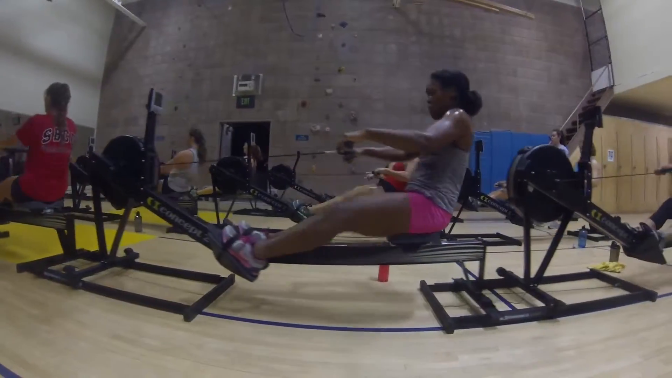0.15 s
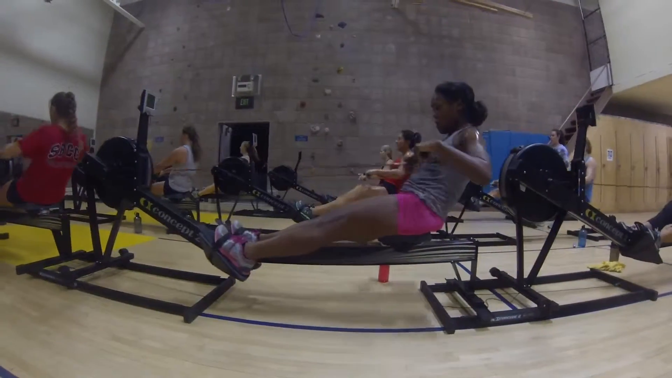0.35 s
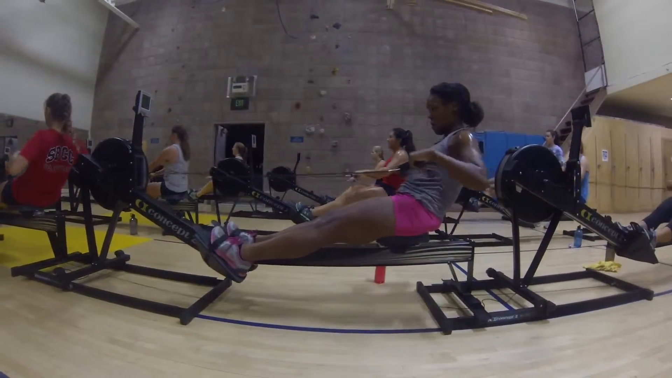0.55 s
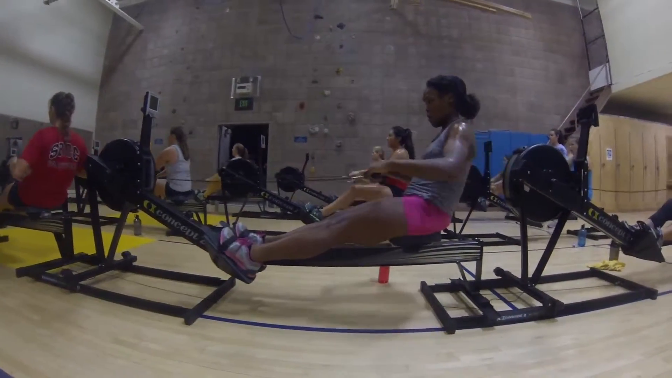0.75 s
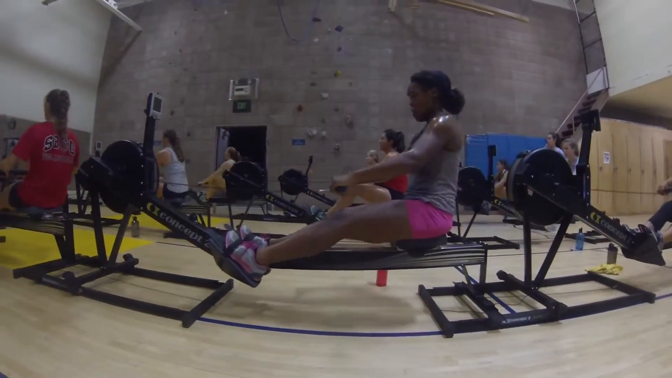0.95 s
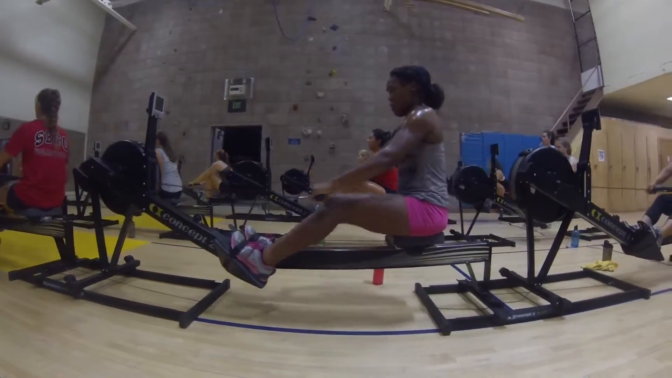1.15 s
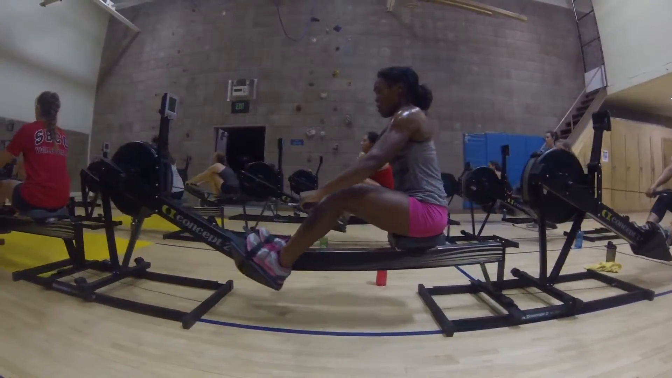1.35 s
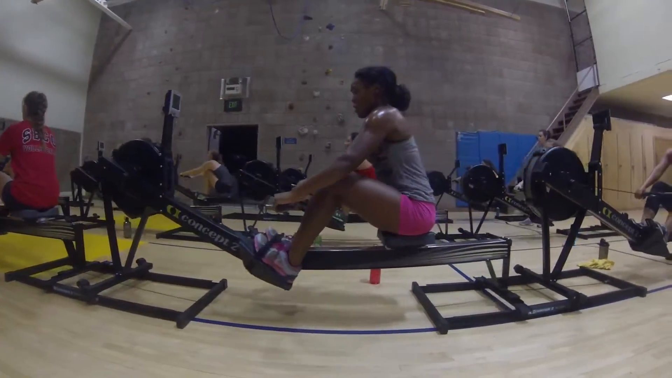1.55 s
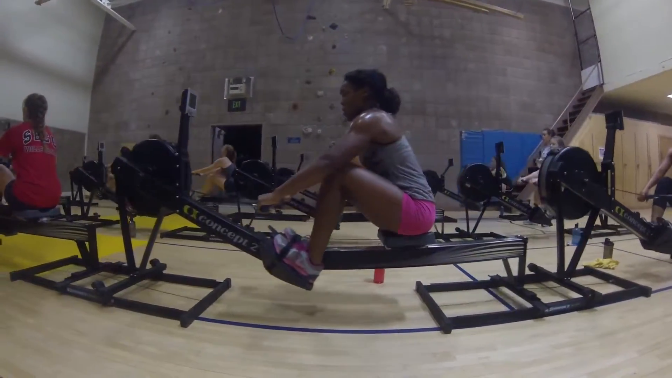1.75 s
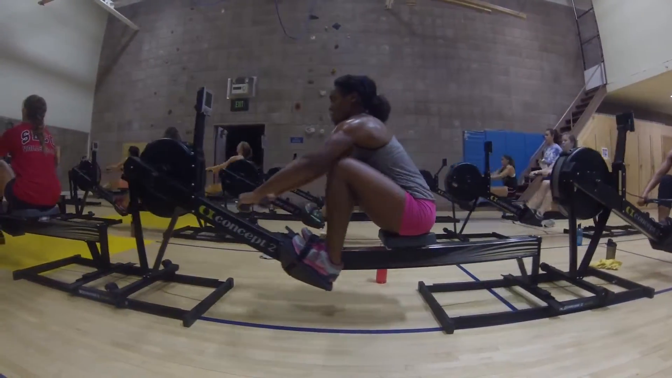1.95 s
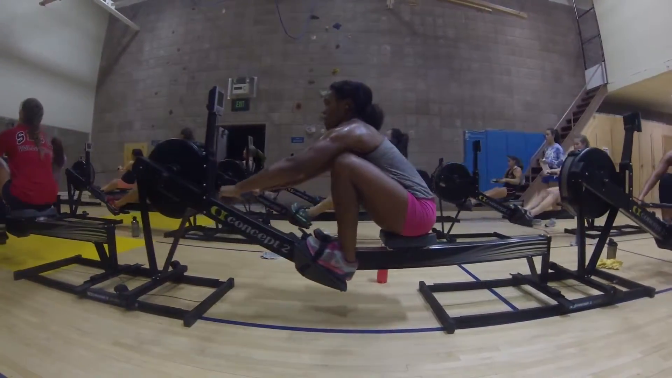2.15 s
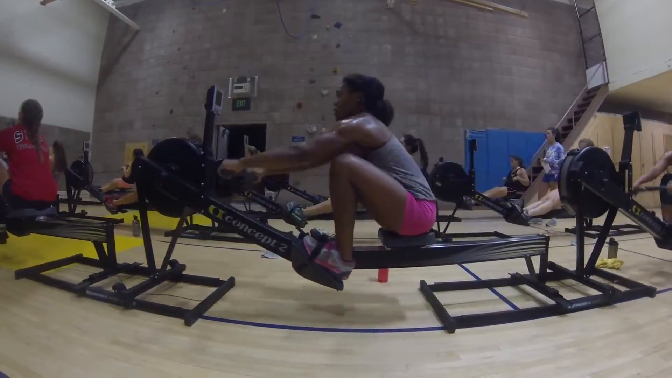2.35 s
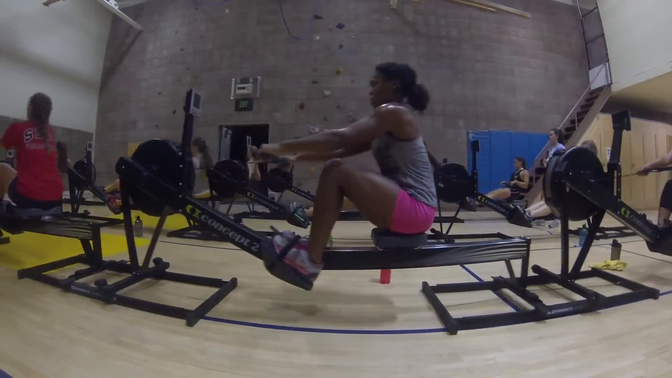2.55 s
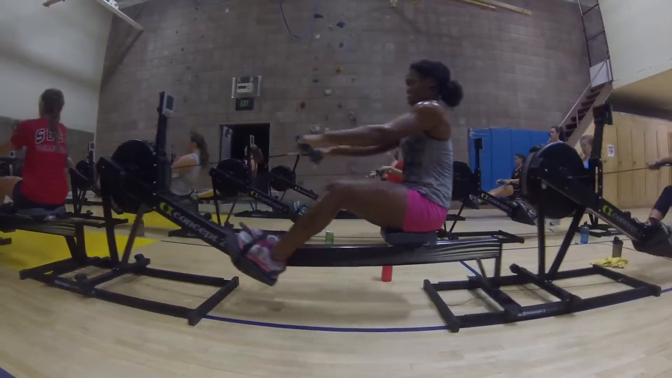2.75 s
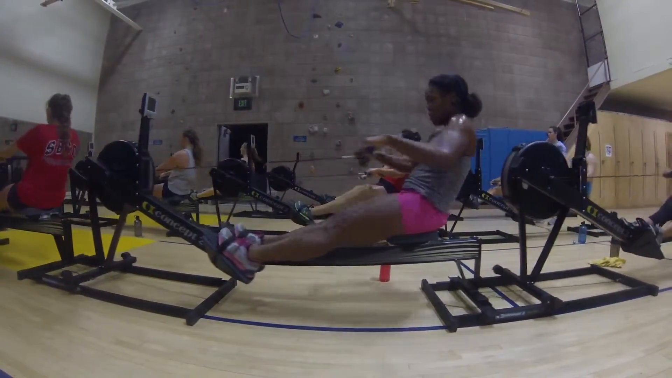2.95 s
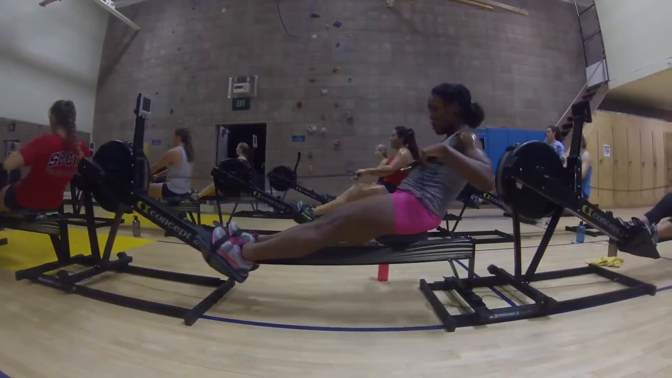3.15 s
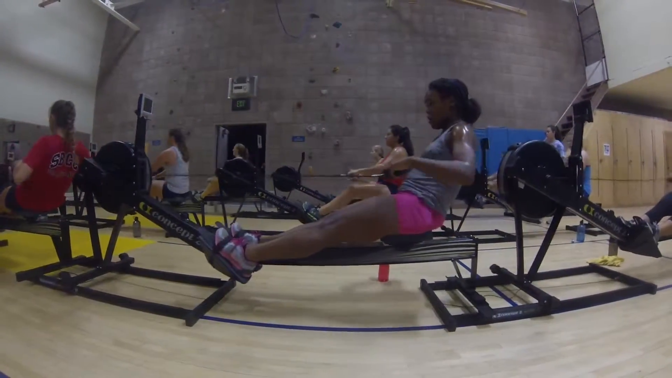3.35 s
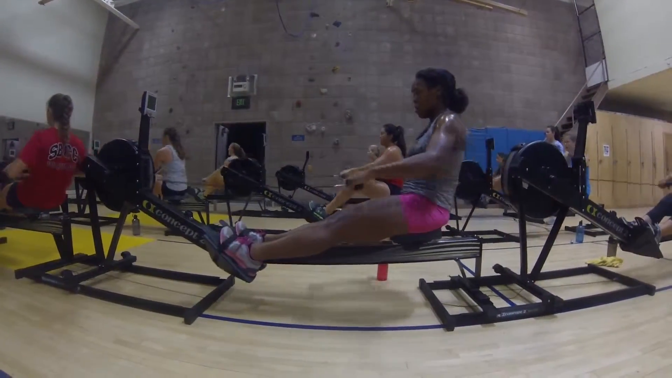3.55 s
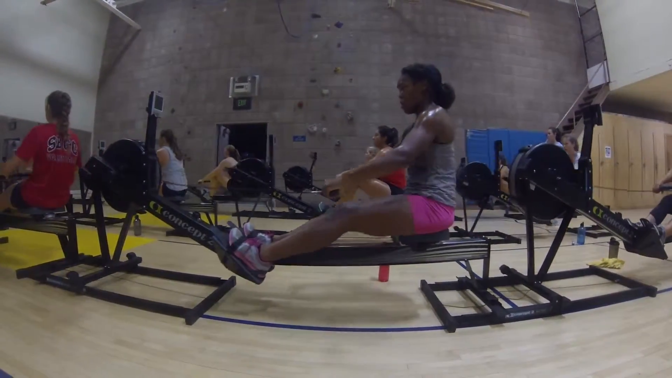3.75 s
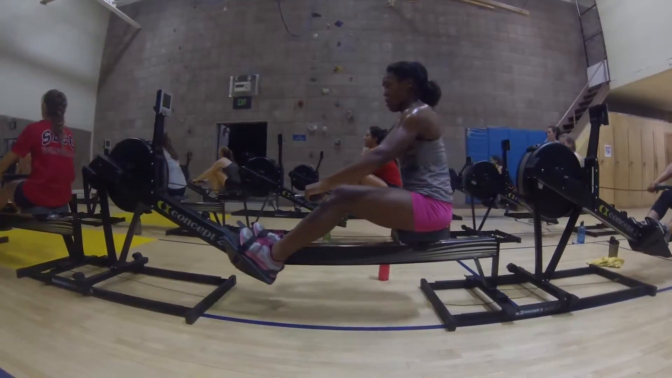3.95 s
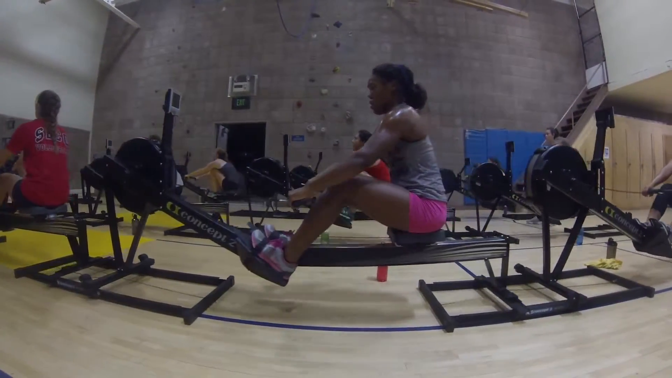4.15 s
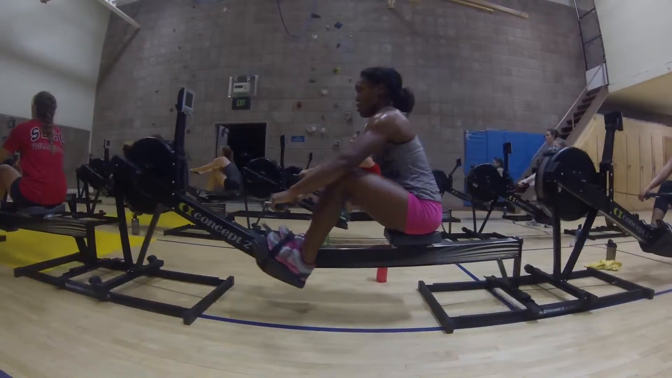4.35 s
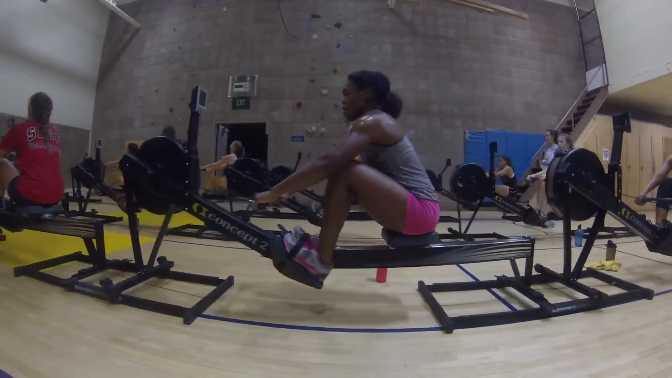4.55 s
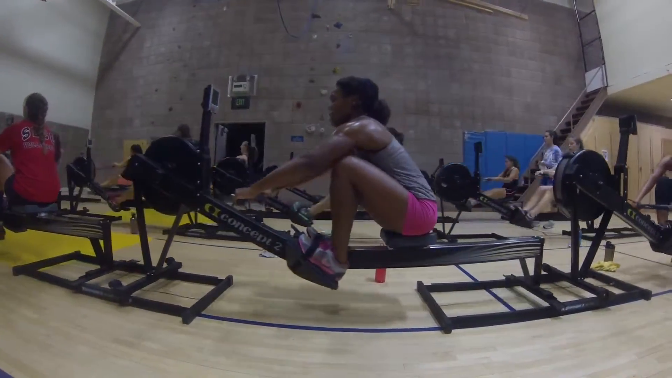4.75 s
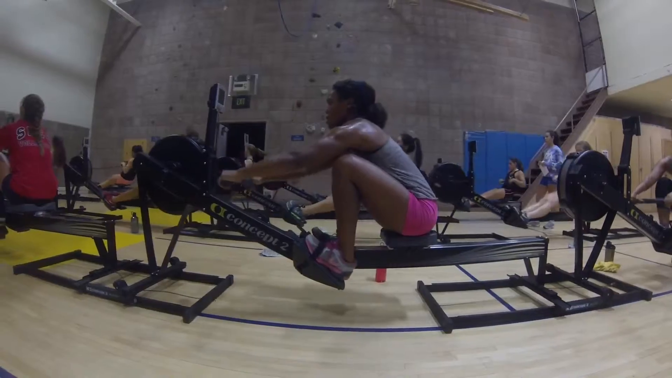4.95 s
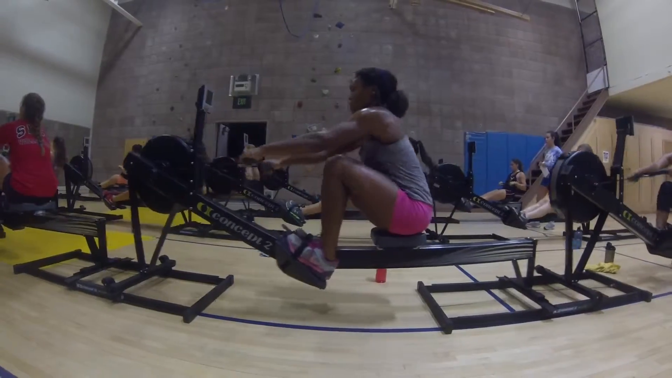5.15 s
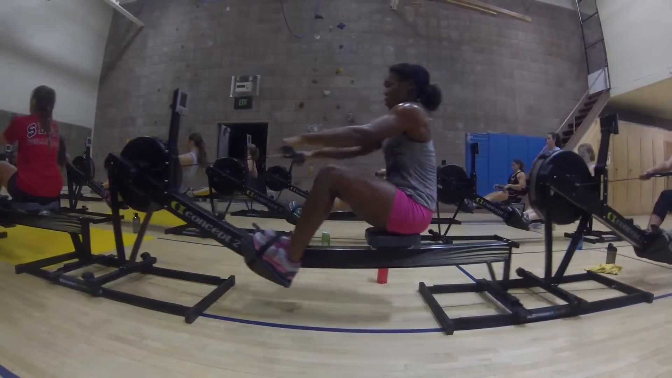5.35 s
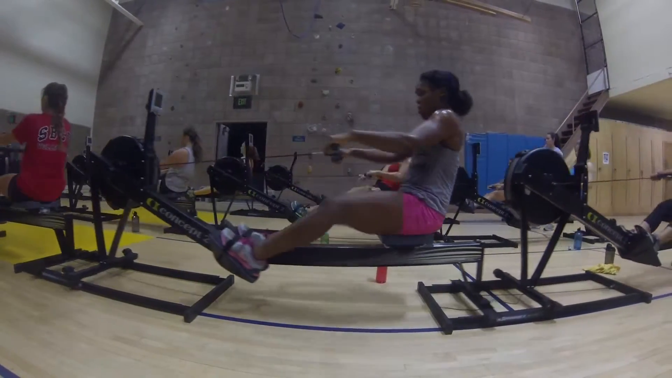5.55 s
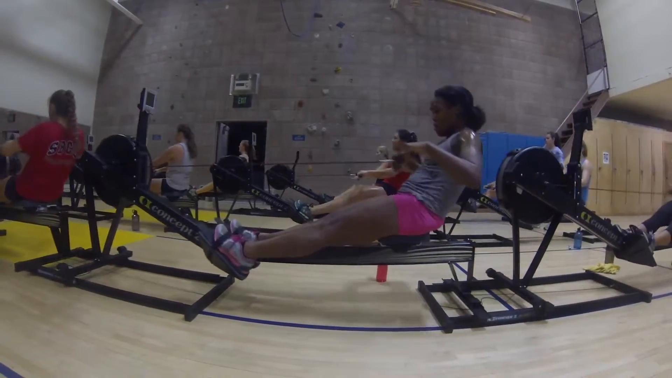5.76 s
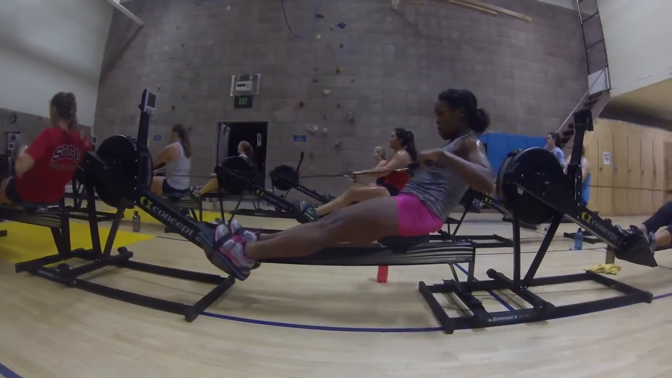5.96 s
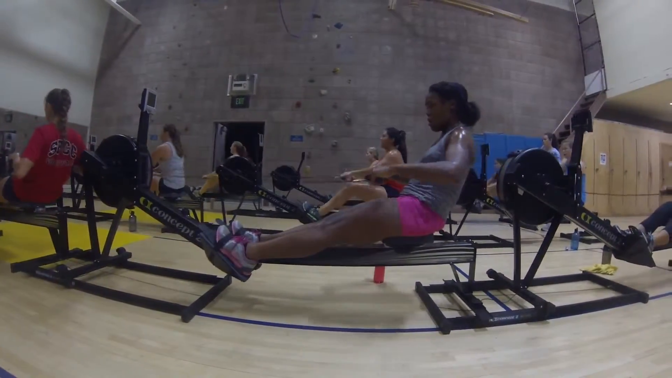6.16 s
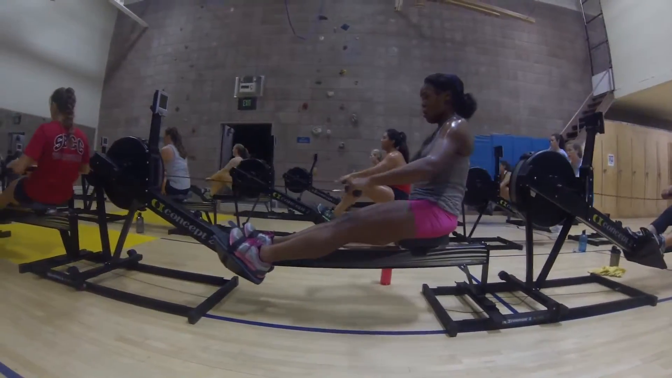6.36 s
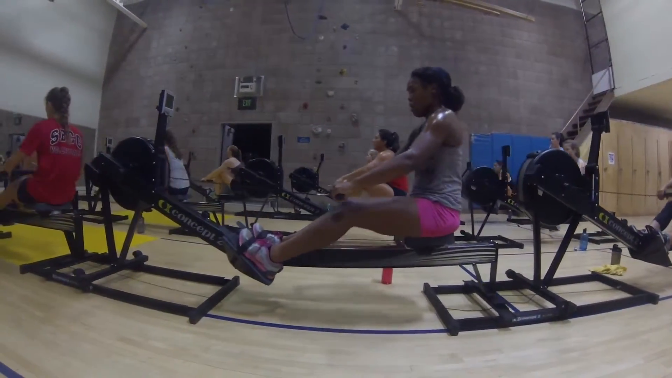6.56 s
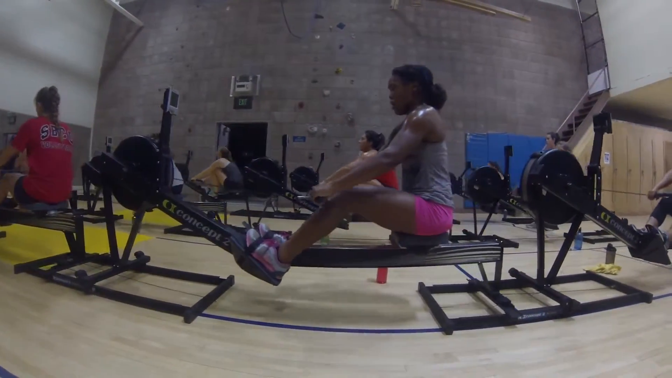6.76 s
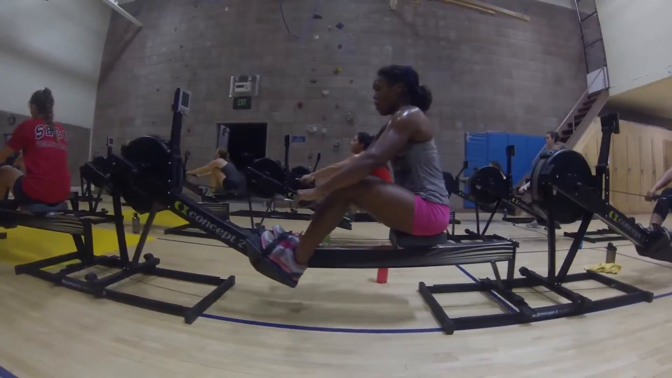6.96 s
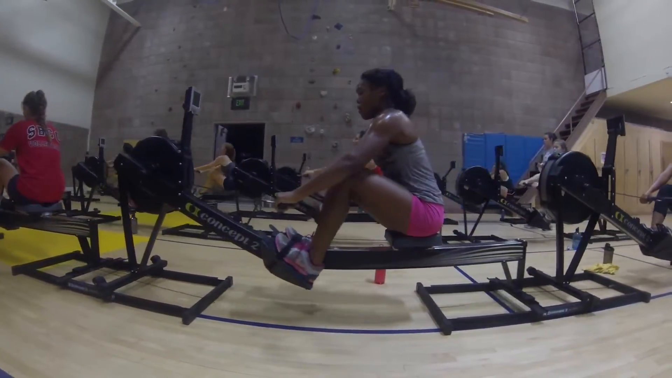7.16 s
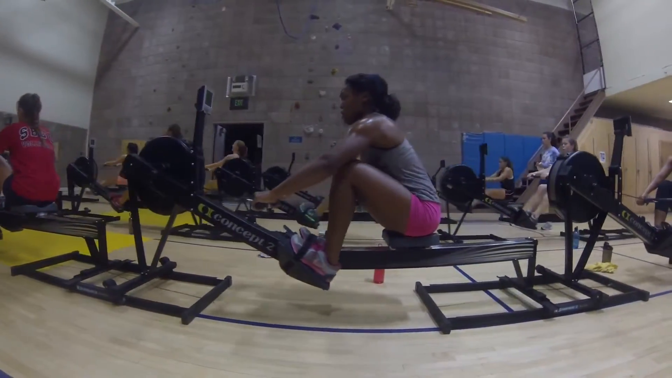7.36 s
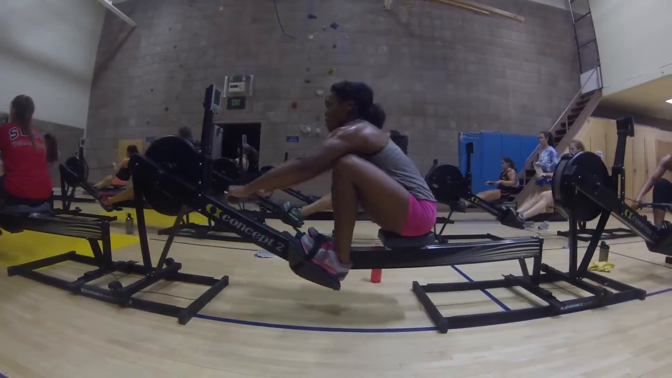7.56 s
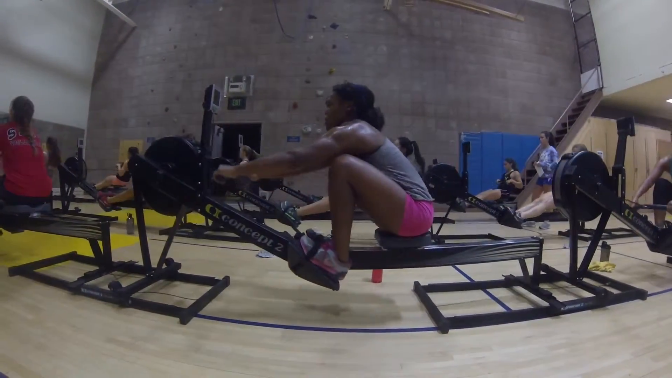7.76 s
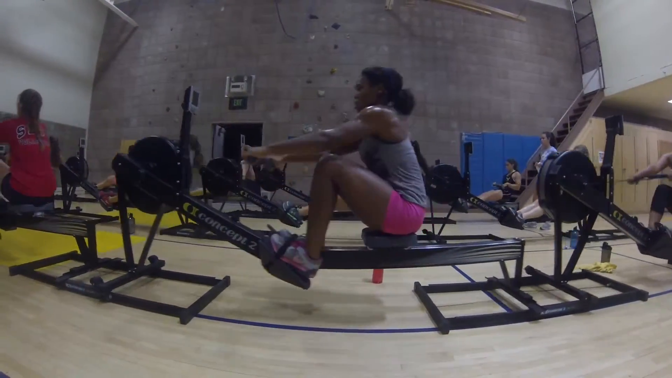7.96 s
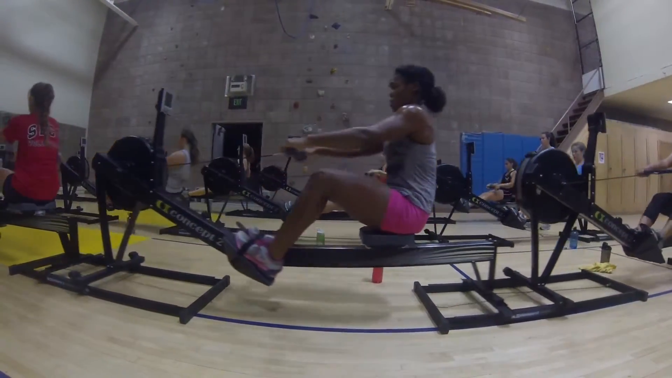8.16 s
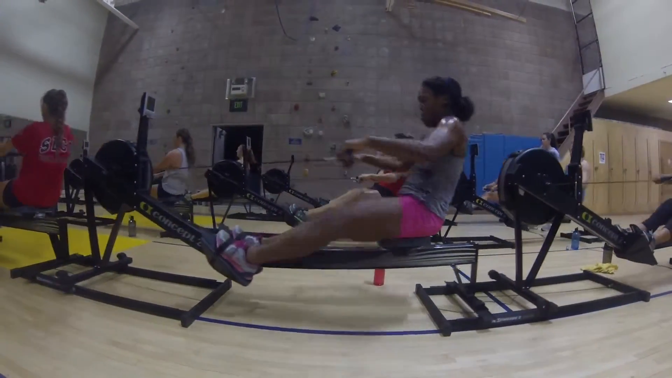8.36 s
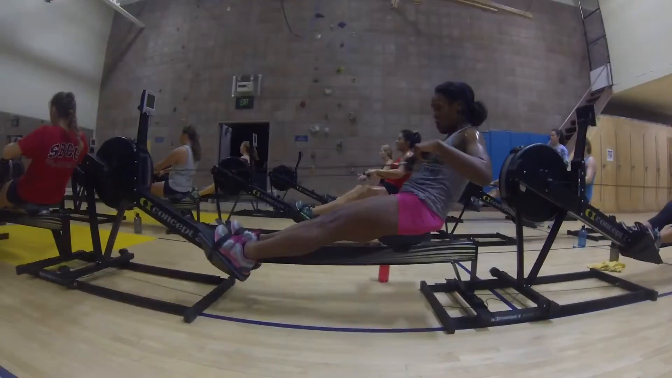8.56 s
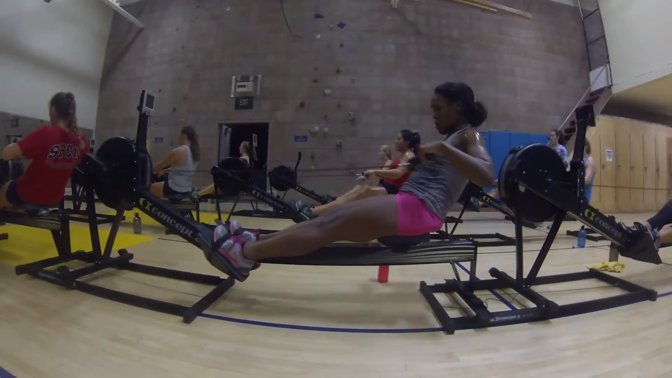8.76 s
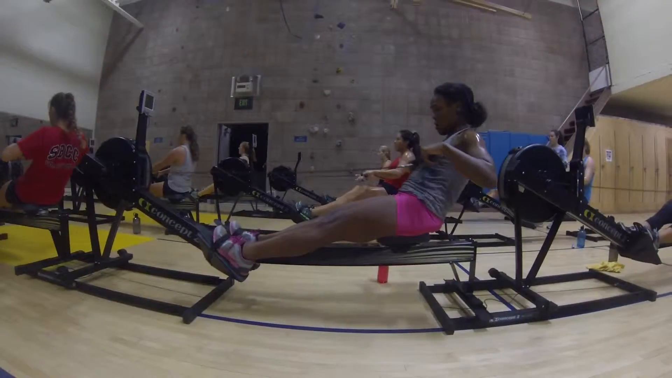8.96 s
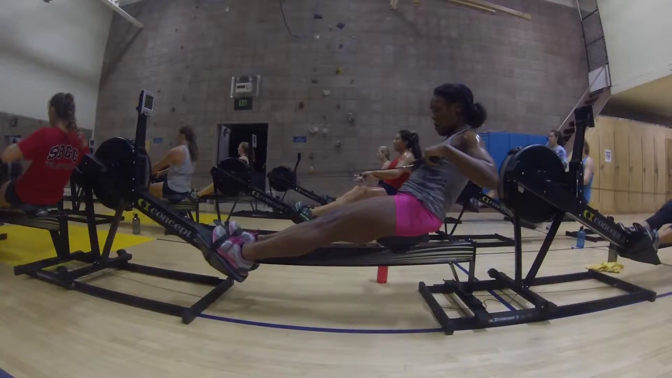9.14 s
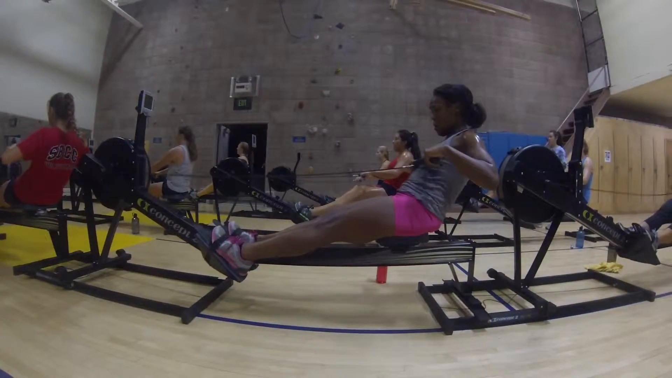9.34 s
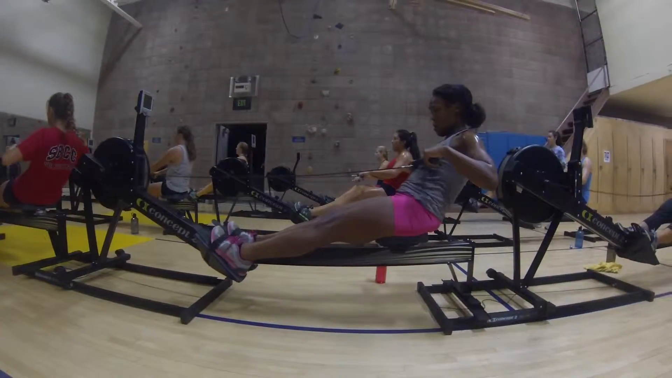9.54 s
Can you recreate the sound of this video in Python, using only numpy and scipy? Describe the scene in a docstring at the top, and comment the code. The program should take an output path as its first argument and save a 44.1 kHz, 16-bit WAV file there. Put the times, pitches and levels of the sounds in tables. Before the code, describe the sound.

Steady dull airy whir of rowing flywheels rises and falls in soft whooshes, while a hand-held camera case ticks loudly, rumbles and bumps.

```python
"""Air flywheels of rowing machines whir in a large hall: flickering noise shaped by the air cavities of a case.
The microphone sits inside the closed plastic case of a small hand-held camera, which muffles the hall.
Noise swells as other rowers pull, and rushes with each pull of the nearest; rolling seats are patchy low noise.
The grip rumbles and bumps with slow pushes, and the case ticks under the fingers as slips ring its shell.
Near the end a jolt shakes the camera, then the sound drops out briefly and stops."""
import sys
import numpy as np
from scipy import signal
from scipy.fft import rfft, irfft
from scipy.io import wavfile
from scipy.ndimage import uniform_filter1d

SR = 44100
rng = np.random.default_rng(int(sys.argv[2]) if len(sys.argv) > 2 else 0)


def dump(signal):
    """Clip the signal to [-1, 1] and save it as 16-bit WAV at the path in sys.argv[1]."""
    limited = np.clip(np.atleast_2d(signal).T, -1, 1)
    pcm = np.round(limited * 32767).astype(np.int16)
    wavfile.write(sys.argv[1], SR, pcm)


N = 423360  # samples, 9.6 s


def undb(db):
    """Amplitude factor of a level in dB."""
    return 10 ** (np.asarray(db) / 20)


def level(x, db):
    """Scale a sound to an rms of db, whatever its own rms was."""
    return x * undb(db) / np.sqrt(np.mean(x ** 2))


def curve(table):
    """A (time [s], value) table drawn as straight lines through every sample."""
    times, values = np.transpose(table)
    return np.interp(np.arange(N) / SR, times, values)


def walk(rate):
    """Slow random wander: levels held 1 / rate seconds and smoothed twice; spread near 1."""
    hold = int(SR / rate)
    steps = np.repeat(rng.standard_normal(N // hold + 1), hold)
    smooth = uniform_filter1d(uniform_filter1d(steps, hold), hold)
    return 1.3 * smooth[:N]  # makes up for the spread lost in smoothing


def power(hz, slope=(), peaks=()):
    """Power per Hz of a broad spectrum plus steep-sided resonances, each 6 dB down at the edges of its width."""
    total = 0
    for centre, width, db in peaks:
        detune = 2 * (hz - centre) / width
        total = total + undb(2 * db) / (1 + detune ** 2) ** 2  # undb(2 * db) is a power
    if len(slope):
        f, db = np.transpose(slope)
        total = total + undb(2 * np.interp(np.log(hz), np.log(f), db, right=-90))
    return total


def noise(slope=(), peaks=(), flicker_db=0., rate=8):
    """Coloured noise of rms 1 in overlapping parts, an octave apart, whose levels flicker on their own."""
    hz = np.maximum(np.arange(N // 2 + 1) * SR / N, 1)
    low_cut = np.minimum(hz / 12, 1) ** 2
    spectrum = rfft(rng.standard_normal(N)) * np.sqrt(power(hz, slope, peaks)) * low_cut
    octave = np.clip(np.log2(hz / 31.25), 0, 9)
    total = np.zeros(N)
    for k in range(10):
        part = np.clip(1 - abs(octave - k), 0, 1)  # triangular band
        total += irfft(spectrum * part, N) * undb(flicker_db * walk(rate))
    return level(total, 0)


def ring(x, hz, t60):
    """One damped mode struck by x, falling 60 dB in t60 seconds."""
    pole = np.exp(2j * np.pi * hz / SR - np.log(1000) / (t60 * SR))
    return signal.lfilter([1], [1, -pole], x).imag


def push(ms):
    """Smooth bell-shaped contact force of area 1, centred on sample 400; ms is two standard deviations."""
    t = np.arange(-400, 401) / SR
    shape = np.exp(-.5 * (t / (ms / 2000)) ** 2)
    return shape / shape.sum()


def add(track, s, sound, db):
    """Lay a sound on the track from time s, scaled to a peak of db."""
    i = int(s * SR)
    track[i:i + len(sound)] += sound * undb(db) / abs(sound).max()


def hall_whir():
    """All the fans of the hall blend into steady air noise, coloured by the case wall and the air inside it."""
    # whir through the case wall: (frequency [Hz], relative level per Hz [dB])
    wall = [(60, -12.5), (150, -15.5), (320, -17), (480, -18), (850, -18), (1050, -22.5), (2300, -19.5),
            (3000, -22.5), (4400, -34), (6300, -28.5), (7200, -30.5), (9000, -37.5), (12500, -39.5),
            (15000, -48.5)]
    # air resonances inside the case: (frequency [Hz], width [Hz], relative level per Hz [dB])
    cavity = [(1296, 187, -1.5), (1446, 180, -4), (1645, 199.7, -10), (1844, 210, -12.5), (3615, 490, -20),
              (5310, 840, -24), (8040, 710, -28), (10140, 2200, -37.5), (13960, 900, -40)]
    return undb(-46) * noise(wall, cavity, flicker_db=0.5, rate=9)


def other_rowers():
    """Distant pulls speed up other fans: a dull whoosh swells and dies on a bell curve, faster up than down."""
    # whooshes across the hall: (time of peak [s], rms level at peak [dB])
    whooshes = [(0.0, -50), (0.78, -50), (1.95, -51), (2.7, -52.5), (3.55, -49.5), (4.55, -49), (5.4, -52),
                (6.28, -49), (7.22, -51), (8.1, -49)]
    # their colour: (frequency [Hz], width [Hz], relative level per Hz [dB])
    bands = [(880, 300, -8.5), (1310, 300, 1), (1750, 400, -9.5)]
    rise_s, fall_s = 0.15, 0.24
    t = np.arange(N) / SR
    swell = np.zeros(N)
    for s, db in whooshes:
        side_s = np.where(t < s, rise_s, fall_s)
        swell += undb(db) * np.exp(-((t - s) / side_s) ** 2)
    return swell * noise(peaks=bands, flicker_db=0.5, rate=12.0)


def nearest_fan():
    """A fan close by is pulled up to speed: its rush of air rises, holds, and dies as the wheel coasts."""
    # pulls of the nearest rower: (time at full speed [s], rms level of the rush [dB])
    pulls = [(0.72, -53.5), (3.55, -53.5), (4.65, -64.5), (6.35, -53.5), (8.5, -57)]
    # colour of the rush: (frequency [Hz], width [Hz], relative level per Hz [dB])
    bands = [(1350, 320, 0.5), (1800, 270, 4), (2600, 1100, -6), (3514, 600, 0), (5384, 330, -25.5),
             (7800, 780, -20.5)]
    rise_s, hold_s, coast_db_per_s = 0.27, .35, 26.5
    t = np.arange(N) / SR
    rush = np.zeros(N)
    for s, db in pulls:
        rise = np.exp(np.minimum(t - s, 0) / rise_s)
        coasting_s = np.maximum(t - s - hold_s, 0)
        rush += rise * undb(db - coast_db_per_s * coasting_s)
    return rush * noise(peaks=bands, flicker_db=0.5, rate=9.3)


def seats():
    """Seats rolling on their rails, felt through the floor as a dull, patchy noise."""
    # loudness of the rolling: (time [s], level [dB])
    roll = [(0.0, -58), (0.65, -58), (2.1, -57), (2.7, -54.5), (3.15, -57.5), (3.6, -56.5), (4.16, -59),
            (4.7, -55), (5.7, -58), (6.3, -58), (6.78, -59), (7.34, -54.5), (7.95, -58), (8.3, -54.5)]
    # its colour: (frequency [Hz], width [Hz], relative level per Hz [dB])
    bands = [(149, 120, -2), (285, 150, -2), (630, 137, -9), (891, 250, -6.5)]
    return undb(curve(roll)) * noise(peaks=bands, flicker_db=2.5, rate=7)


def grip_rumble():
    """The hand holding the case makes a restless low noise right at the microphone."""
    # loudness of the hand on the case: (time [s], level [dB])
    grip = [(0.0, -44), (0.27, -47), (0.65, -41.5), (1.1, -48), (1.7, -47.5), (2.65, -48.5), (3.1, -50),
            (3.7, -47), (4.1, -50), (4.85, -46), (5.2, -48), (5.95, -50.5), (6.25, -43.5), (6.52, -52),
            (6.75, -45), (7.4, -44.5), (7.95, -49.5), (8.2, -45.5), (8.5, -37.5)]
    # its colour: (frequency [Hz], relative level per Hz [dB])
    rumble = [(12, 1.5), (25, 2), (50, -6.5), (70, -11), (110, -18.5), (200, -35.5)]
    return undb(curve(grip)) * noise(rumble, flicker_db=1.2, rate=13)


def grip_bumps():
    """The grip shifts: a short round push that swings slowly back the other way."""
    # shifts of the grip: (time of push [s], peak level [dB], half length of push [ms], direction [sign])
    bumps = [(.053, -36, 5.8, -1), (.102, -32, 3.7, -1), (.675, -33, 1.3, 1), (1.152, -39.5, 1.2, -1),
             (2.514, -32, 1.65, 1), (3.683, -30, 1.54, -1), (6.015, -39.5, 2.3, 1), (6.279, -37, 0.99, -1),
             (6.291, -31.5, 1.6, 1), (6.39, -35.5, 1.6, -1), (7.289, -36, 1, -1), (8.202, -30.5, 1.45, -1),
             (8.243, -32, 1.4, -1), (8.34, -32.5, 0.73, -1), (8.359, -29.5, 2, -1), (8.476, -26.5, 2.1, 1),
             (8.491, -26.5, 1, 1)]
    out = np.zeros(N)
    for s, db, ms, sense in bumps:
        t = np.arange(-4 * ms, 16 * ms, 1000 / SR) / ms  # in half lengths of the push
        swing_back = 0.41 * np.exp(-((t - 5.0) / 5.6) ** 2)
        bump = np.exp(-t ** 2 / 2) - swing_back
        add(out, s - .004 * ms, np.sign(sense) * bump, db)  # starts 4 half lengths early
    return out


def ticks():
    """Two quick slips of opposite sense ring the plastic shell, and a dull knock goes with them."""
    # ticks under the fingers: (time [s], shell peak level [dB], contact length [ms],
    # second slip over first [dB], peak of the dull knock over that of the shell [dB])
    tick_list = [(0.152, -5.5, 0.076, 14, -33), (0.3933, -16.5, .12, 9, -25), (0.7982, -11, 0.088, 15, -28),
                 (1.205, -19, 0.19, 10.5, -11.5), (1.4687, -15, 0.15, 17, -22), (4.065, -9, 0.093, 21, -30),
                 (4.758, -16.5, 0.16, 16, -16.5), (8.471, -22.5, 0.19, 16, -4.5),
                 (8.496, -31, 0.15, 1, -5.5)]
    # modes of the shell: (frequency [Hz], mean gain [dB], t60 [s], sense of swing [sign])
    modes = [(537, -24.5, 0.01293, 1), (792, -17.5, 0.022, -1), (1271, -6, 0.025, 1), (1567, 2, 0.0127, 1),
             (1923, 5, 0.0065, -1), (2320, -6, 0.008, 1), (2960, -9, 0.011, -1), (3260, -8.5, 0.017, 1),
             (3900, -2.5, 0.0088, -1), (4920, -3.5, 0.0058, 1), (6190, -18.5, 0.014, -1),
             (8150, 0.5, 0.0052, -1), (10600, 7, 0.0024, -1), (13120, 9.5, .003, 1),
             (15170, 10.5, .003, -1)]
    slip_gap_s, scatter_db = .00065, 0.71  # the gains scatter anew at each tick
    out = np.zeros(N)
    for s, db, ms, slip_db, knock_db in tick_list:
        slips = np.zeros(2000)
        slips[0] = 1
        slips[int(slip_gap_s * SR)] = -undb(slip_db)
        force = np.convolve(slips, push(ms))
        shell = np.zeros(len(force))
        for hz, gain_db, t60, sense in modes:
            gain = undb(gain_db + scatter_db * rng.standard_normal())
            shell += np.sign(sense) * gain * ring(force, hz, t60)
        start = s - 400 / SR  # puts the middle of the first slip at s
        add(out, start, shell, db)
        add(out, start, ring(force, hz=290, t60=0.012), db + knock_db)
    return out


def last_shake():
    """A last jolt leaves the camera shaking in the hand: one low damped swing."""
    out = np.zeros(N)
    jolt = np.arange(SR // 4) == 0  # a single-sample impulse
    add(out, 8.503, -ring(jolt, hz=45, t60=0.3), db=-27)
    return out


def scene():
    """The hall, the nearby rower and the handling noise together, in one channel."""
    hall = hall_whir() + other_rowers() + nearest_fan() + seats()
    handling = grip_rumble() + grip_bumps() + ticks() + last_shake()
    return (hall + handling)[None]


def record(dry):
    """The sound drops out for a moment between short linear fades, stops dead, and the top is cut."""
    dropout_start_s, dropout_end_s, stop_s = 8.5673, 8.5773, 8.5941
    fade_s, top_hz = .0015, 15400
    t = np.arange(N) / SR
    outside_s = np.maximum(dropout_start_s - t, t - dropout_end_s)  # time away from the dropout
    running = np.clip(outside_s / fade_s, 0, 1) * (t < stop_s)
    top_cut = signal.ellip(8, .2, 70, top_hz, fs=SR, output="sos")
    return signal.sosfilt(top_cut, dry * running)


dry = scene()
out = record(dry)
dump(out)
```